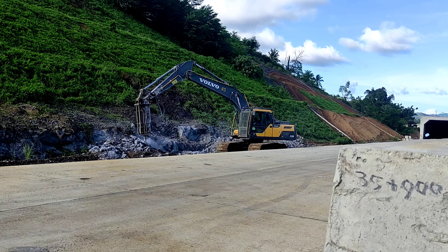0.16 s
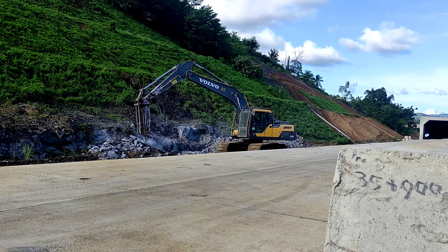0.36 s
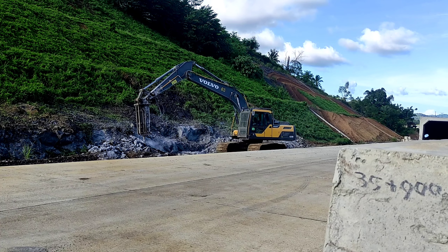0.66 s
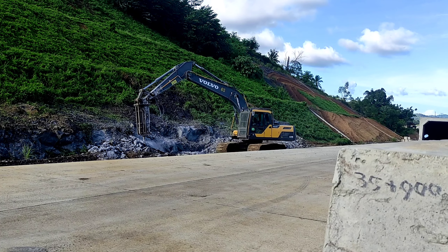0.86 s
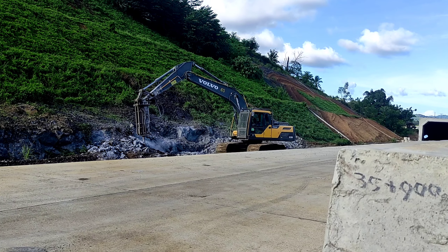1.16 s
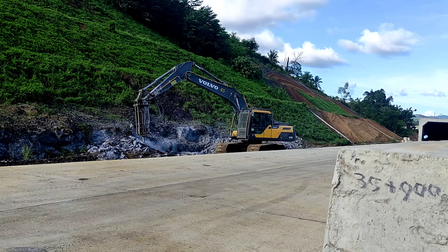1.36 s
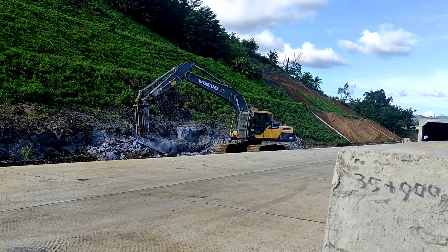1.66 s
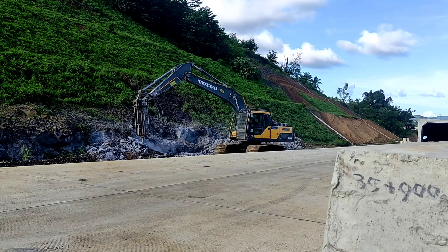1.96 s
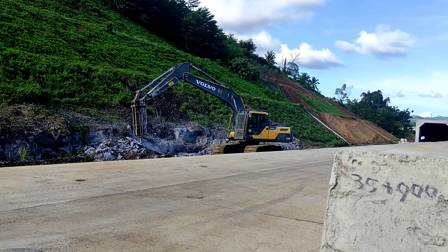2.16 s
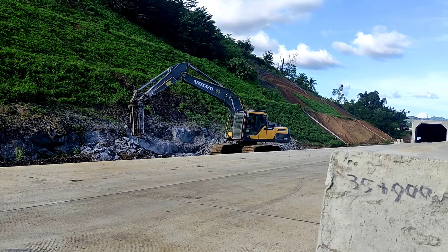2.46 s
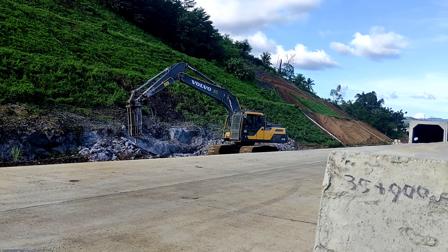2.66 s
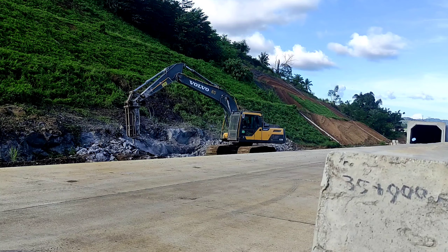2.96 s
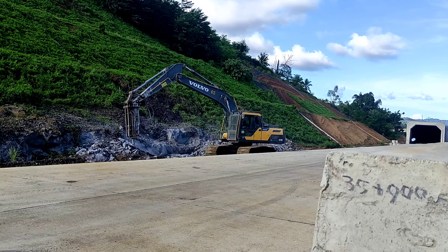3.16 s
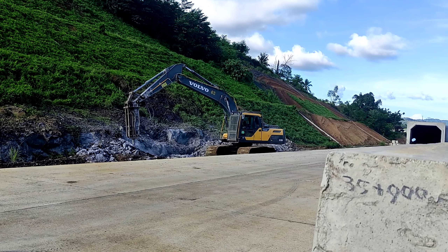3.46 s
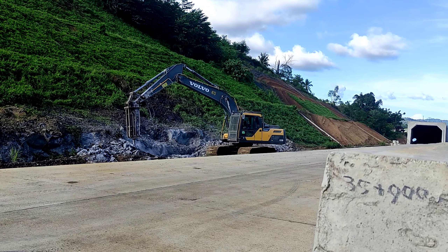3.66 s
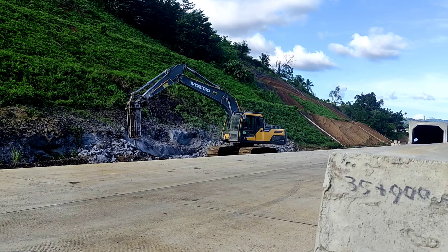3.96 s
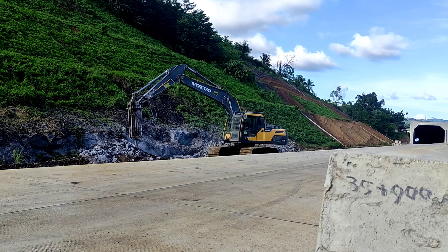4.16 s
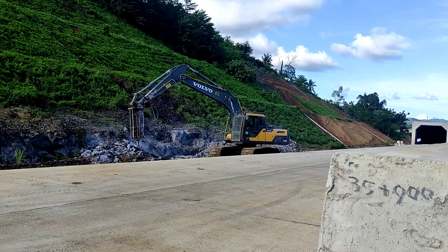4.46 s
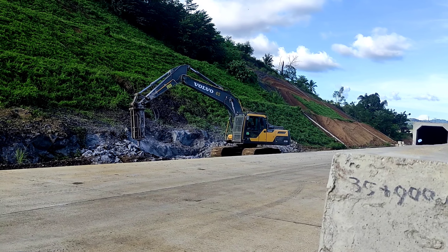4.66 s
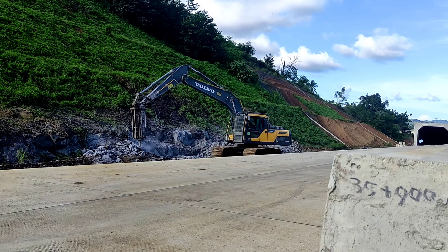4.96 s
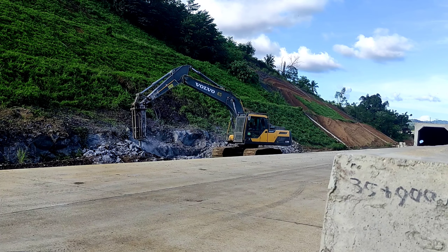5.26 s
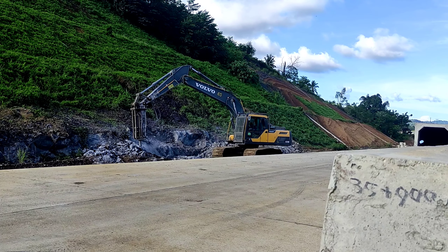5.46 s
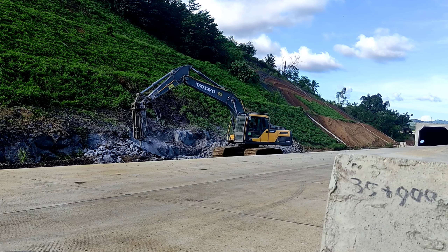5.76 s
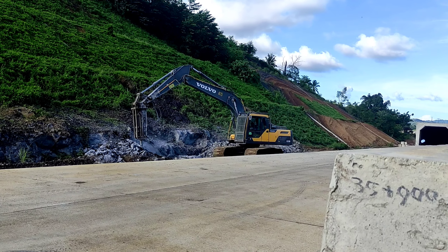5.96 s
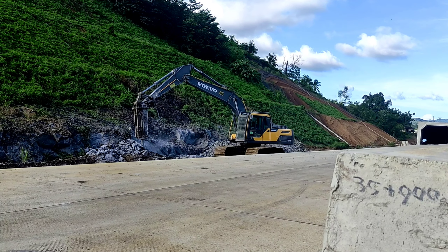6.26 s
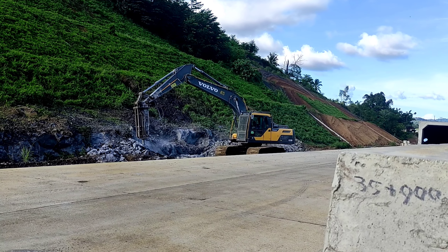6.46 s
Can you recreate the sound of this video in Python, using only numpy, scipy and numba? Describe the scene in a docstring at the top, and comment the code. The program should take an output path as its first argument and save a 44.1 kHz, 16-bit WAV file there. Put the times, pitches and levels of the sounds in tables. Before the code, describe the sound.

A hydraulic breaker on an excavator hammers rock in uneven runs of rapid metallic blows, pausing at times, over a steady droning diesel engine.

```python
"""A hydraulic breaker is already hammering rock below a hillside, in runs of blows over a droning diesel.
Each cycle is a bright noise clack as the piston fires, then a noise crack as the chisel hits rock.
Decaying sines ring the steel, noise bursts crunch and rumble, and scattered noise echoes answer from the slope.
The diesel is wavering exhaust harmonics over coloured noise; a loose slab clanks once, a decaying sine.
The recorder's limiter ducks the loudest peaks."""
import sys
import numpy as np
from scipy import signal
from scipy.fft import rfft, irfft
from scipy.io import wavfile
from scipy.ndimage import uniform_filter1d
from numba import njit

SR = 44100
rng = np.random.default_rng(int(sys.argv[2]) if len(sys.argv) > 2 else 0)


def pcm_store(signal):
    """Save signal as 16-bit PCM."""
    levels = np.round(np.clip(np.atleast_2d(signal), -1, 1) * 32767)
    wavfile.write(sys.argv[1], SR, levels.astype(np.int16).T)


N = 291060
TIME = np.arange(N) / SR

# All table levels are relative: each layer gets its own level in the mix.
# Diesel roar of fan and pumps, noise colour: [pitch_hz, level_db_per_hz]
ROAR_COLOUR = [(22, -30), (40, -36), (58, -8.5), (90, -11.5), (135, 1), (280, 0.5), (420, 1.5), (540, -9.5),
               (1000, -16), (1700, -19), (2500, -27.5), (5000, -37), (10000, -40.5), (15000, -48)]
# Diesel speed, picking up in the long pause: [time_s, firing_rate_hz]
FIRING_RATE = [(0, 66.8), (1.45, 67), (1.68, 69.2), (2.1, 68.1), (2.4, 68), (2.7, 66.4), (6.6, 66.3)]
# Exhaust harmonics: [multiple_of_firing_rate, level_db]
EXHAUST_HARMONICS = [(1, -15), (2, -12), (3, 1), (4, -24), (6, -4.5)]
# Colour of the hillside's echoes: [pitch_hz, level_db]
SLOPE_COLOUR = [(60, -14), (500, -19), (1700, -6), (2800, -8), (5000, -6), (9000, -6.5), (15000, -6)]
# Runs of the hammer, one for each squeeze of the pedal:
# [first_blow_s, blow_count, cycle_s, shortening_per_blow_s, first_cycle_extra_s, last_blow_late_s]
HAMMER_RUNS = [(-.086, 4, .139, .003, 0, 0), (.588, 7, .1298, .0002, .028, 0),
               (2.411, 9, .1471, .0024, .0013, .019), (3.796, 13, .1367, .0004, .0065, .0094),
               (5.706, 2, .135, 0, .013, 0), (6.128, 4, .1337, 0, .011, 0)]
# How hard the boom leans on the chisel: [time_s, pressure_0_to_1]
BOOM_PRESSURE = [(0, 0.3), (1.4, 0), (2.4, 0.18), (3.5, 0), (4.2, 0.63), (5.3, 0.62), (6.6, 0.85)]
# Steel modes, their decay before any choking: [pitch_hz, level_db, t60_s, full_pressure_change_db]
BOOM_MODES = [(246.2, -9.5, 0.62, 12), (329.5, -6.5, 0.95, 11), (366.4, -11, 1, -3), (377, -18, 0.28, -5),
              (470.6, -1.5, 0.78, 1.5), (587, -4, 0.48, -2)]  # boom, shaken as the piston fires
HOUSING_MODES = [(747, -4, 0.41, -5.5), (807, 3.5, 0.097, -10), (842, 3.5, 0.12, -10.5),
                 (1146, -0.5, 0.087, 9), (1328, -9, 0.097, 12.5), (1750, -1.5, 0.13, -5),
                 (1777, 0.5, 0.11, -3)]  # hammer housing
CHISEL_MODES = [(3376, -2, .14, -2), (3927, -5, .1, 0), (4286, -10, .12, 4), (5158, -9, .12, 1),
                (5313, 2, .16, -5), (6056, -9, .12, 0), (6380, -1, .08, 1), (8161, -3, .17, -6),
                (10610, -3, .16, -2), (12850, -19, .12, 0), (15038, -18, .14, 0)]  # the chisel's strongest modes
# Noise colours of the blow: [pitch_hz, level_db_per_hz]
CLACK_COLOUR = [(50, -4), (150, 17), (330, 17.5), (480, 14.5), (650, -3), (1400, 11), (2100, -11.5),
                (3000, -11), (4200, 5), (5300, -1), (7000, 1.5), (11000, 1.5), (15000, -12.5)]  # piston
CRACK_COLOUR = [(40, -10), (150, -1.5), (450, 15), (650, -0.5), (820, 8.5), (1250, 6.5), (1750, 11),
                (2150, -7), (3600, 0), (6200, -0.5), (7200, -5), (10800, -11.5), (15000, -21)]  # chisel on rock
RATTLE_COLOUR = [(1900, 7), (2300, 3), (3500, 3), (5400, 6), (7000, -0.5), (8200, 4.5), (9200, -4),
                 (10800, 2.5), (13000, -4.5), (15000, -15)]  # level contour for the bushings and plates
CRUNCH_COLOUR = [(300, 1), (800, -6), (1700, 14.5), (2300, 8), (3600, 10), (6000, 2.5), (7100, -39),
                 (8200, 9), (11000, -9), (15000, -11)]  # rock fragments
RUMBLE_COLOUR = [(50, -17), (140, 3), (350, 5.5), (800, 13), (1250, 6.5), (1750, -0.5), (2300, -4),
                 (4200, -3.5), (7000, -43), (15000, -34)]  # arm
# The two microphone ports: [pitch_hz, left_minus_right_db, left_lead_radians]
MIC_PORTS = [(0, .7, 0), (400, .9, 0), (750, 0, .1), (1300, -3.5, .3), (2400, 0, 3.1), (3400, -.7, 4.2),
             (3900, -1.2, 6), (5100, -1, 6.4), (5500, -.5, 9.5), (7700, 1, 12.4), (8500, 2.5, 15.5),
             (10600, 7, 18.3), (15000, 12, 18.5)]

CLACK_LEAD_S = .028  # the piston's clack comes this long before the crack
REBOUND_S = .019  # the chisel meets its retainer this long after the crack
SLUGGISH_SHARE = .25  # share of the extra cycle length left after each cycle
BLOW_SCATTER_DB = 1.11  # standard deviation from blow to blow
HUM_DB_PER_HZ = 1.5  # the exhaust tones swell as the engine picks up
HUM_WAVER_DB, ROAR_WAVER_DB = 3.5, 2.2  # each scales a random walk
TOP_HZ = 15500  # recorder's treble cut


def undb(db):
    """Decibels to gain."""
    return 10 ** (np.asarray(db) / 20)


def curve(rows):
    """Rows (time_s, value) joined by straight lines."""
    return np.interp(TIME, *np.transpose(rows))


def fade(t60, size=SR):
    """Exponential decay from 1, down 60 dB after t60 seconds."""
    return undb(-60 * np.arange(size) / SR / t60)


def walk(rate_hz):
    """Smoothed random drift around 0 with a spread near 1, a new value at the given rate."""
    hold = int(SR / rate_hz)
    steps = np.repeat(rng.standard_normal(N // hold + 1), hold)
    return uniform_filter1d(steps, hold)[:N]


def noise(colour, size=N, apart_hz=2600, most_apart=0.72):
    """Stereo noise of rms 1 with a given colour; the bass is nearly alike on both sides."""
    hz = np.fft.rfftfreq(size, 1 / SR) + 1
    points, db = np.transpose(colour)
    gain = undb(np.interp(np.log(hz), np.log(points), db))
    mid, side = rfft(rng.standard_normal((2, size))) * gain
    side = side * most_apart * np.clip(hz / apart_hz, .15, 1)
    stereo = irfft([mid + side, mid - side], size)
    return stereo / stereo.std()


def play(times, gains, sound):
    """The same sound set off at each time, which may lie up to a second before zero."""
    kicks = np.zeros((1, N + SR))
    places = np.round((times + 1) * SR).astype(int)
    kicks[0, np.clip(places, 0, N + SR - 1)] = gains
    return signal.fftconvolve(kicks, np.atleast_2d(sound), axes=1)[:, SR:SR + N]


def bursts(times, gains, colour, rise_s, t60, alike, grain_db=0):
    """Dense, dying noise: a share of the power repeats from blow to blow, the rest is new and may be grainy."""
    shape = fade(t60) * (1 - np.exp(-TIME[:SR] / rise_s))
    same = play(times, gains, shape * noise(colour, size=SR))
    grain = undb(grain_db * walk(400))
    grain /= np.sqrt(np.mean(grain ** 2))
    # overlapping bursts of fresh noise add in power
    envelope = np.sqrt(np.abs(play(times, gains ** 2, shape ** 2)))
    new = envelope * noise(colour) * grain
    return np.sqrt(alike) * same + np.sqrt(1 - alike) * new


def ring(times, gains, pressure, modes, scatter_db, spread, rise_s, choke_s=1, detune_hz=0, size=SR // 2):
    """Steel modes that swell, fade and choke as parts seat again; level, phase and tuning can vary by blow."""
    hz, db, t60, pressed_db = np.transpose(modes)
    t = TIME[:size]
    waves = np.exp(np.outer(2j * np.pi * hz - np.log(1000) / t60, t))
    swell_and_choke = (1 - np.exp(-t / rise_s)) * np.exp(-(t / choke_s) ** 2)
    waves = (waves * swell_and_choke).astype(np.complex64)
    strength, turn, skew = rng.standard_normal((len(times), 3, len(hz))).transpose(1, 0, 2)
    # all modes of one blow shift together
    shift_hz = detune_hz * rng.standard_normal(len(times))
    detune = np.exp(2j * np.pi * np.outer(shift_hz, t))
    mode_db = db + np.outer(pressure, pressed_db) + scatter_db * strength
    weight = gains[:, None] * undb(mode_db)
    starts = ((times + 1) * SR).astype(int)
    out = np.zeros((2, N + 2 * SR))
    for channel, sign in enumerate((1, -1)):
        # opposite phase skews widen the stereo image
        phase = np.pi * turn + sign * spread * skew
        kicks = (weight * np.exp(1j * phase)).astype(np.complex64)
        rings = (detune * (kicks @ waves)).imag
        for start, sound in zip(starts, rings):
            out[channel, start:start + size] += sound
    return out[:, SR:SR + N]


def diesel():
    """Wavering exhaust harmonics over fan and pump noise, roughened at the firing rate."""
    rate = curve(FIRING_RATE)
    phase = 2 * np.pi * np.cumsum(rate * (1 + .007 * walk(18))) / SR
    tones = np.zeros(N)
    for multiple, db in EXHAUST_HARMONICS:
        level = undb(db + HUM_WAVER_DB * walk(13))
        tones += level * np.sin(multiple * phase + 2 * np.pi * rng.random())
    roughness = 1 + 0.1 * np.sin(phase)
    roar = noise(ROAR_COLOUR) * roughness * undb(ROAR_WAVER_DB * walk(12))
    hum_gain = undb(-33.5 + HUM_DB_PER_HZ * (rate - rate.mean()))
    return hum_gain * tones + undb(-26.5) * roar


def hillside(near, t60, lumpy_db):
    """Scattered echoes from rubble and slope: convolution with coloured, lumpy, fading noise."""
    shape = fade(t60) * (1 - np.exp(-TIME[:SR] / 0.078))
    echoes = noise(SLOPE_COLOUR, size=SR) * shape * undb(lumpy_db * walk(120.7)[:SR])
    echoes /= np.sqrt(np.sum(echoes ** 2) / 2)
    return signal.fftconvolve(near, echoes, axes=1)[:, :N]


def loose_slab(start_s=.561, pitch_hz=1400, t60=0.095, level_db=-13):
    """A loose slab clanks as the chisel bites again: one decaying sine."""
    clank = fade(t60) * np.sin(2 * np.pi * pitch_hz * TIME[:SR])
    return play(np.array([start_s]), undb(level_db), clank)


def blow_times():
    """Runs can start slowly until oil pressure is up, quicken, and end late as the valve shuts."""
    times = []
    for start, blows, cycle, shortening, extra, late in HAMMER_RUNS:
        k = np.arange(blows - 1)
        cycles = cycle - shortening * k + extra * SLUGGISH_SHARE ** k
        cycles[-1] += late
        times.append(start + np.append(0, np.cumsum(cycles)))
    return np.concatenate(times)


def dense_modes(t60, uneven_db, count=96):
    """The many weaker treble modes of bushings, pins and side plates, scattered in pitch, level and decay."""
    place, strength, life = rng.random((count, 3)).T
    points, contour_db = np.transpose(RATTLE_COLOUR)
    hz = points[0] + (points[-1] - points[0]) * (np.arange(count) + place) / count
    db = np.interp(hz, points, contour_db) + uneven_db * (strength - .5)
    return np.column_stack([hz, db, t60 * (.5 + life), np.zeros(count)])


def arm_rumble(s, db, press):
    """The whole arm rumbles after each blow, louder under pressure."""
    return bursts(s, undb(db - 23.5 + 11.4 * press), RUMBLE_COLOUR, rise_s=0.0061, t60=0.6, alike=0.38)


def rock_crunch(s, db, press):
    """More pressure crushes more rock: a louder burst of fragment noise."""
    gains = undb(db - 20 + 10 * press)
    return bursts(s + REBOUND_S, gains, CRUNCH_COLOUR, rise_s=0.0061, t60=0.16, alike=1.0, grain_db=5)


def retainer_ping(s, db, press):
    """The chisel bounces back against its retainer and its modes give a short, choked ping."""
    return ring(s + REBOUND_S, undb(db - 13.5), press, CHISEL_MODES, scatter_db=2.5, spread=.7,
                rise_s=.005, choke_s=.019, detune_hz=12, size=SR // 8)


def piston_clack(fired, clack_db, boom_db, press):
    """The piston fires: a noise clack, a shiver of chisel and housing, a shove on the boom."""
    clack = bursts(fired, undb(clack_db - 12.5), CLACK_COLOUR, rise_s=0.0023, t60=0.092,
                   alike=0.41, grain_db=3)
    clack += ring(fired, undb(clack_db - 24), press, CHISEL_MODES, scatter_db=3.5, spread=.9,
                  rise_s=0.0018, choke_s=0.03, detune_hz=30.4, size=SR // 8)
    clack += ring(fired, undb(clack_db - 19), press, HOUSING_MODES, scatter_db=6.5, spread=0.073,
                  rise_s=0.023, choke_s=0.089, detune_hz=16.7, size=SR // 8)
    clack += ring(fired, undb(boom_db - 17.5), press, BOOM_MODES, scatter_db=2, spread=0.14, rise_s=0.043)
    return clack


def chisel_crack(s, db, rattle_db, press):
    """The chisel strikes rock: a sharp noise crack that rings housing, plates and chisel."""
    plates = dense_modes(t60=.1, uneven_db=16)
    crack = bursts(s, undb(db - 2.5), CRACK_COLOUR, rise_s=0.00036, t60=0.075, alike=0.47, grain_db=2)
    crack += ring(s, undb(db - 15.5), press, HOUSING_MODES, scatter_db=1, spread=0.11,
                  rise_s=0.00069, detune_hz=3.6, size=SR // 4)
    crack += ring(s, undb(rattle_db - 31), press, plates, scatter_db=3.5, spread=.7,
                  rise_s=.004, detune_hz=35, size=SR // 8)
    crack += ring(s, undb(rattle_db - 21), press, CHISEL_MODES, scatter_db=0, spread=0.96,
                  rise_s=0.0035, choke_s=0.072, detune_hz=8.4, size=SR // 8)
    return crack


def breaker():
    """Every stage of the blow, scattered in level from blow to blow and answered by the slope."""
    s = blow_times()
    db, clack_db, rattle_db = BLOW_SCATTER_DB * rng.standard_normal((len(s), 3)).T
    press = np.interp(s, *np.transpose(BOOM_PRESSURE))
    near = arm_rumble(s, db, press)
    near += rock_crunch(s, rattle_db, press)
    near += retainer_ping(s, rattle_db, press)
    near += piston_clack(s - CLACK_LEAD_S, clack_db, db, press)
    near += chisel_crack(s, db, rattle_db, press)
    return near + undb(-15.5) * hillside(near, t60=1.0, lumpy_db=2)


def scene():
    """Sums the sources at two ports: the left leads above the bass and is brighter at the top."""
    air = diesel() + loose_slab() + breaker()
    port_hz, balance_db, lead = np.transpose(MIC_PORTS)
    hz = np.fft.rfftfreq(N, 1 / SR)
    half = np.array([[1], [-1]]) / 2  # half the difference to each side
    tilt = undb(half * np.interp(hz, port_hz, balance_db))
    tilt /= np.sqrt(np.mean(tilt ** 2, axis=0))  # keeps the power of the pair
    turn = np.exp(1j * half * np.interp(hz, port_hz, lead))
    return irfft(rfft(air) * tilt * turn, N)


@njit
def follow(x, attack, release):
    """Envelope that jumps up with the peaks and sinks slowly."""
    out, level = np.empty(len(x)), 0.
    for i in range(len(x)):
        level += (x[i] - level) * (attack if x[i] > level else release)
        out[i] = level
    return out


def limiter(x, ceiling_db, attack_s, release_s, ahead_s):
    """Turns the gain down just before peaks above the ceiling and lets it creep back."""
    peaks = np.abs(x).max(axis=0)
    envelope = follow(peaks, 1 / (1 + attack_s * SR), 1 / (1 + release_s * SR))
    envelope = np.interp(TIME + ahead_s, TIME, envelope)
    return x / np.maximum(envelope / undb(ceiling_db), 1)


def record(dry):
    """Input gain, limiter, hard clipping and a steep treble cut."""
    gained = undb(-14.0) * dry / dry.std()
    held = limiter(gained, ceiling_db=-3, attack_s=0.00017, release_s=0.084, ahead_s=0.00096)
    clipped = np.clip(held, -.92, .92)
    treble_cut = signal.ellip(10, .2, 80, TOP_HZ, fs=SR, output="sos")
    return signal.sosfilt(treble_cut, clipped)


dry = scene()
out = record(dry)
pcm_store(out)
```